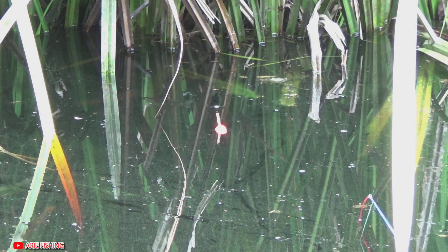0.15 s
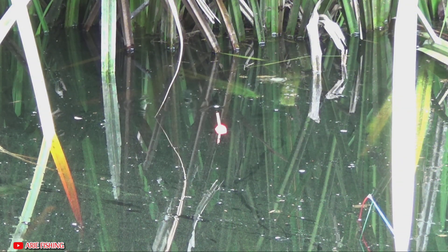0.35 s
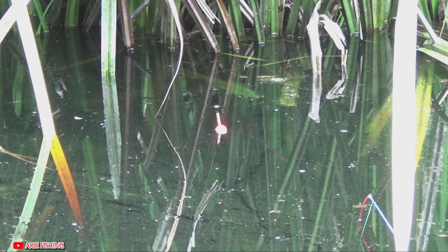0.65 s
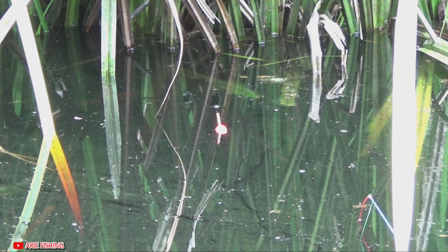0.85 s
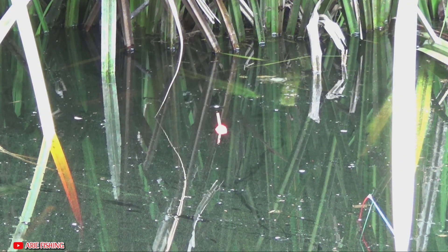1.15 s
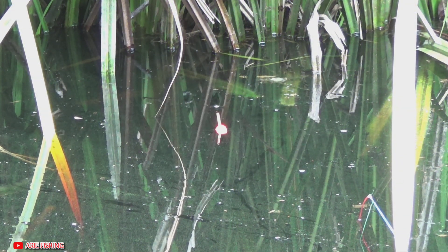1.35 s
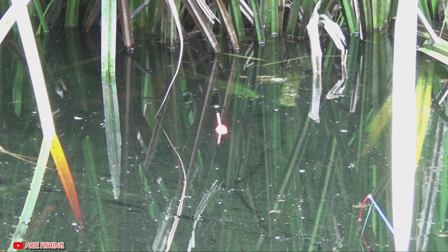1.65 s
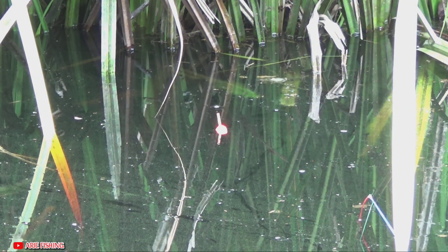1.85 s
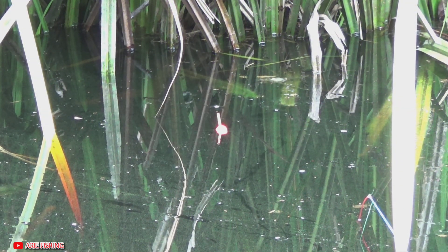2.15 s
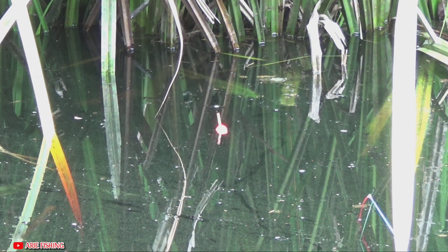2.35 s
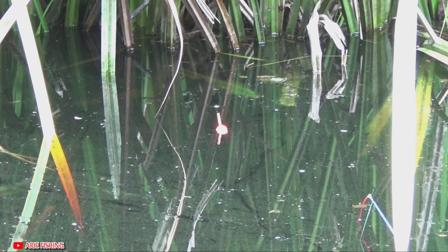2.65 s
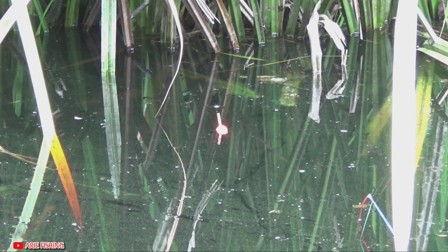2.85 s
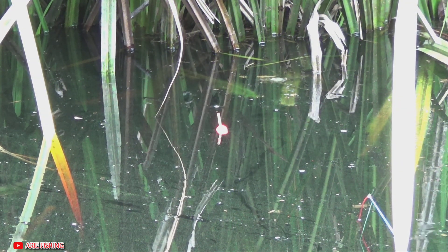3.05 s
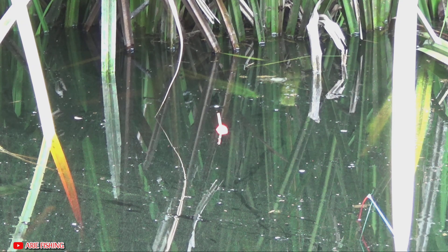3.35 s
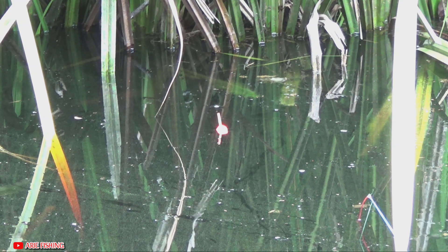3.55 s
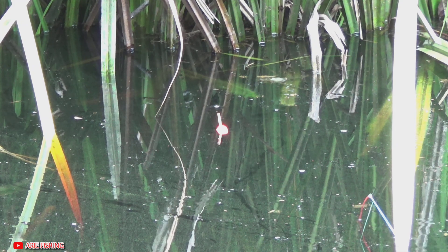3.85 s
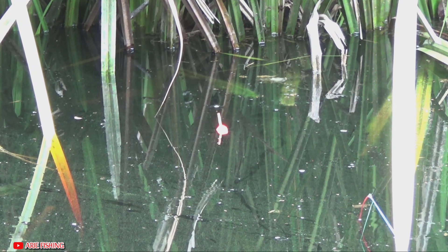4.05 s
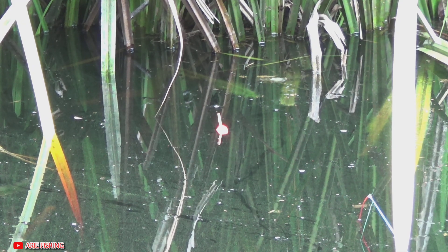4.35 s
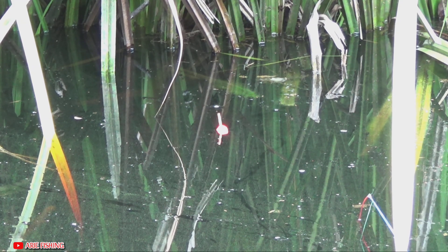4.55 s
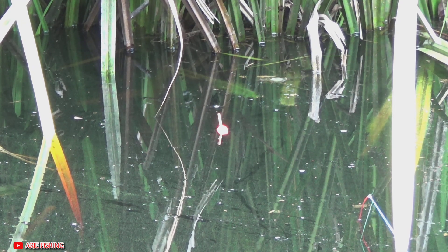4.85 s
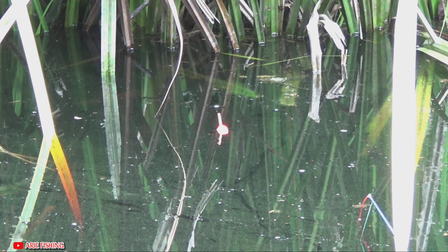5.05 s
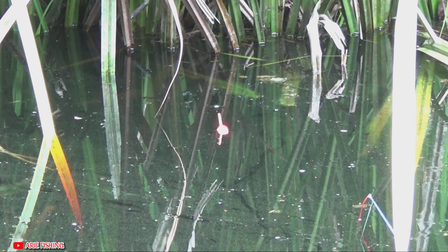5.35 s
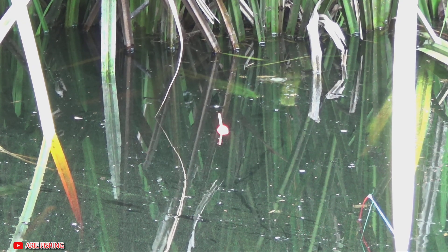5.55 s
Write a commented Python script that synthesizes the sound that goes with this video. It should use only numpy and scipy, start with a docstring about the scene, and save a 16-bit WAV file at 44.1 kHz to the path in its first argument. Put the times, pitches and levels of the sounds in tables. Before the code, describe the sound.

Dry reeds rustle close by in swells and snap, then something hollow knocks several times, over faint buzzing swamp insects.

```python
"""Among swamp reeds, with a stereo microphone close to dry leaves that rustle in swells and snap now and then.
The rustle is a hiss roughened by many tiny slips. Blows ring the modes of a hollow thing, mostly late on.
Around them insects buzz and trill over a faint hiss, a rough band swells, and one drop rings its bubble.
Farther off a frog chirps through the reeds, a bird rasps and a few clear pips sound."""
import sys
import numpy as np
from scipy import signal
from scipy.fft import rfft, irfft
from scipy.io import wavfile
from scipy.ndimage import uniform_filter1d

SR = 44100
rng = np.random.default_rng(int(sys.argv[2]) if len(sys.argv) > 2 else 0)


def int16_out(signal):
    """Quantize to a 16-bit WAV file."""
    q = np.round(np.clip(np.atleast_2d(signal).T, -1, 1) * 32767)
    wavfile.write(sys.argv[1], SR, q.astype(np.int16))


N = 250929
TIME = np.arange(N) / SR


def gain_of(db):
    """Decibels to gain."""
    return 10 ** (np.asarray(db) / 20)


def unit_rms(x):
    """Scales to rms 1."""
    return x / np.sqrt(np.mean(x ** 2) + 1e-20)


def at_frequency(points, hz):
    """Reads a table on a log-frequency axis."""
    f, value = np.transpose(points)
    return np.interp(np.log(hz + 1), np.log(f + 1), value)


def add(mix, start, sound, pan_db):
    """Mixes a sound in from start [s] on, pan_db louder on the left than on the right."""
    at = round(start * SR)
    sound = sound[max(-at, 0):]
    part = mix[:, max(at, 0):][:, :len(sound)]
    part += gain_of([[pan_db / 2], [-pan_db / 2]]) * sound[:part.shape[1]]


def resonate(x, hz, width):
    """A resonance that can glide: shifts hz down to zero, smooths, and shifts back."""
    turn = np.exp(2j * np.pi * np.cumsum(hz * np.ones(len(x))) / SR)
    pole = np.exp(-np.pi * width / SR)
    return 2 * (turn * signal.lfilter([1 - pole], [1, -pole], x / turn + 1e-18)).real


def noise_band(count, hz, width):
    """Noise through a resonance applied twice."""
    return unit_rms(resonate(resonate(rng.standard_normal(count), hz, width), hz, width))


def coloured(pair, spectrum, likeness, tilt, top_db, patchy_db):
    """Gives two noises a spectrum, a moving tilt and top, drifting patches and a left-right likeness."""
    hz, t, (left, other) = signal.stft(pair, SR, nperseg=512, noverlap=384)
    patches = rng.standard_normal(left.shape)
    patches = unit_rms(uniform_filter1d(uniform_filter1d(patches, size=14, axis=0), size=12, axis=1))
    same = at_frequency(likeness, hz)[:, None]
    right = same * left + np.sqrt(1 - same ** 2) * other
    slope_db = np.log2((hz[:, None] + 100) / 4000) * np.interp(t, TIME, tilt)
    lift_db = np.clip(4 * np.log2((hz[:, None] + 1) / 10000), 0, 1) * np.interp(t, TIME, top_db)
    colour = gain_of(at_frequency(spectrum, hz)[:, None] + slope_db + lift_db + patchy_db * patches)
    return signal.istft(np.array([left, right]) * colour, SR, nperseg=512, noverlap=384)[1][:, :N]


def swell_power(rows):
    """Power of a row of swells with rounded tops; rise and fall each span 10 dB."""
    power = np.full(N, 1e-12)
    for peak_time, db, rise, fall in rows:
        away = np.where(TIME < peak_time, (peak_time - TIME) / rise, (TIME - peak_time) / fall)
        power += gain_of(2 * (db - 10 * away ** 1.45))
    return power


# Spectrum of the swamp's ambience: (frequency [Hz], relative density [dB])
AMBIENCE_SPECTRUM = [(15, -51), (25, -19), (44, -11), (624, 3.5), (1370, -2.5), (3160, -2.5), (6050, -9.5),
                     (7710, 0.5), (8590, -4), (9570, -0.5), (11000, -7.5), (14800, -12.5), (16000, -14)]
# How alike it arrives on both sides of the microphone: (frequency [Hz], correlation [0-1])
AMBIENCE_LIKENESS = [(60, .85), (250, .7), (900, .5), (3000, .6), (7000, .75), (15000, 1)]


def swamp_ambience():
    """A faint steady hiss from all around."""
    noise, flat = rng.standard_normal((2, N)), np.zeros(N)
    hiss = coloured(noise, AMBIENCE_SPECTRUM, AMBIENCE_LIKENESS, tilt=flat, top_db=flat, patchy_db=.8)
    return gain_of(-53.5 + np.array([[.3], [-.3]])) * unit_rms(hiss)


# A far bird, near the centre:
# (time [s], length [s], pitch [Hz], width [Hz], level [dB], throb rate [Hz])
BIRD_NOTES = [(2.504, .22, 3940, 200, -49.5, 52), (2.515, .09, 3200, 700, -51, 66),
              (2.575, .2, 3200, 600, -49.5, 60)]


def far_bird():
    """Short rasping whistles with a quick start, a throb and a fading end."""
    out = np.zeros((2, N))
    for start, length, hz, width, db, throb_hz in BIRD_NOTES:
        t = np.arange(0, length, 1 / SR)
        shape = signal.windows.tukey(len(t), .12) * gain_of(-15 * t / length)
        shape *= 1 - 0.22 * np.cos(2 * np.pi * throb_hz * t)
        add(out, start, gain_of(db) * shape * noise_band(len(t), hz, width), pan_db=-.3)
    return out


# Pips in the distance, a little left: (time [s], pitch [Hz], level [dB])
PIP_NOTES = [(2.323, 1885, -46), (2.342, 1890, -43.5), (2.362, 1920, -49), (2.863, 3750, -50)]


def far_pips():
    """Clear whistles of 16 ms."""
    out, t = np.zeros((2, N)), np.arange(0, .016, 1 / SR)
    for start, hz, db in PIP_NOTES:
        add(out, start, gain_of(db) * np.sin(2 * np.pi * hz * t) * np.hanning(len(t)), pan_db=3.0)
    return out


# A far frog repeats its phrase off to the right: (time [s], level [dB])
FROG_PHRASES = [(1.807, -50), (2.401, -52), (2.995, -50.5)]
# The chirps of one phrase: (delay [s], relative level [dB])
FROG_CHIRPS = [(0, -6), (.043, -1.5), (.125, 0), (.166, 1.5)]


def far_frog():
    """Each chirp holds its top pitch briefly, drops, and smears out among the reeds."""
    out, t = np.zeros((2, N)), np.arange(0, .028, 1 / SR)
    pitch = np.interp(t, [0, .01, .02, .028], [2500, 2497, 1926, 1870])
    shape = signal.windows.tukey(len(t), .45) * gain_of(-220 * t)
    chirp = shape * np.sin(2 * np.pi * np.cumsum(pitch) / SR)
    tail = 0.042 * gain_of(-60 * np.arange(6000) / SR / 0.14)
    for start, db in FROG_PHRASES:
        for delay, chirp_db in FROG_CHIRPS:
            scatter = tail * rng.standard_normal(len(tail))
            scatter[0] = 1  # the direct path to the microphone
            add(out, start + delay, gain_of(db + chirp_db) * signal.oaconvolve(chirp, scatter), -6.0)
    return out


# A rasp in the background, a little left: (peak time [s], level [dB], rise [s], fall [s])
RASP_SWELLS = [(.1, -58, .3, .4), (.55, -52, .1, 0.09), (.9, -45, 0.22, .22), (2, -60, .2, 0.13),
               (3.3, -55, 0.27, .2), (3.62, -56, .2, .15)]


def rasp():
    """A broad rough band near 2 kHz that swells and fades."""
    level = np.sqrt(swell_power(RASP_SWELLS))
    centre, spread = (level * noise_band(N, hz=2160, width=1170) for _ in range(2))
    return gain_of([[1.5], [-1.5]]) * centre + np.outer([.35, -.35], spread)


# Insects around the microphone: (time [s], buzz level [dB], chorus level [dB])
INSECT_LEVELS = [(0, -52, -59), (.6, -49, -56), (1.5, -55, -60.5), (2.5, -69, -61.5), (3.2, -59.5, -62),
                 (4, -56.5, -58.5), (4.8, -56, -60), (5.69, -52, -63)]


def insects():
    """A high buzz that throbs about eight times a second and a smooth lower chorus."""
    beat = np.sin(2 * np.pi * 8.2 * (TIME - 5.354))
    depth_db = np.interp(TIME, [4.3, 4.9], [2, 4])
    throb = gain_of(depth_db * np.tanh(2 * beat))
    times, *levels = np.transpose(INSECT_LEVELS)
    buzz, chorus = (gain_of(np.interp(TIME, times, db)) for db in levels)
    centre, spread = (buzz * throb * noise_band(N, 9580, 810) + chorus * noise_band(N, 7830, 800)
                      for _ in range(2))
    return centre + np.outer([.35, -.35], spread)


# One cricket, a little left: (time [s], length [s], level [dB])
CRICKET_TRILLS = [(-.1, 0.34, -53.5), (.66, 0.29, -51), (1.941, .38, -51), (2.75, .38, -53.5),
                  (3.632, 0.33, -50)]


def cricket():
    """A grainy trill that climbs at the start and pulses with 85 wing strokes a second."""
    out = np.zeros((2, N))
    for start, length, db in CRICKET_TRILLS:
        t = np.arange(0, length, 1 / SR)
        pitch = np.interp(t, [0, .035, .075, .35], [6900, 6850, 7200, 7150])
        swell_db = np.interp(t, [0, .05, .09, .28, .36], [-5, -0.5, 2.0, 2.5, -11])
        shape = gain_of(db + swell_db) * signal.windows.tukey(len(t), .3)
        strokes = 1 + 0.16 * np.sin(2 * np.pi * 85 * t)
        tone = unit_rms(noise_band(len(t), pitch, 60) + 0.73 * noise_band(len(t), pitch, 270))
        add(out, start, shape * strokes * tone, pan_db=3.0)
    return out


# A drop of water to the right: (time [s], length [s], first pitch [Hz], last pitch [Hz], level [dB])
DROP = (4, 0.01, 718, 1102, -39)


def water_drop():
    """The bubble of a drop rises in pitch as it nears the surface."""
    out = np.zeros((2, N))
    start, length, first_hz, last_hz, db = DROP
    pitch = np.geomspace(first_hz, last_hz, round(length * SR))
    bubble = np.sin(2 * np.pi * np.cumsum(pitch) / SR) * signal.windows.tukey(len(pitch), .4)
    add(out, start, gain_of(db) * bubble, pan_db=-4.0)
    return out


# Modes of the hollow thing: (frequency [Hz], level [dB], nominal t60 [s])
HOLLOW_MODES = [(148.6, -3.5, 0.24), (183, -7, .1), (225.6, -2.5, 0.16), (267, -6.5, 0.145),
                (402, -8, 0.093), (517, -6, 0.14), (585, 0.5, .12), (732, 0.5, 0.088), (1054, -17, .06),
                (1200, -9.5, 0.089), (1300, -16, 0.091), (1650, -6, .07), (2003, -18, 0.072),
                (2860, -19, .05)]
# Blows on it, left of the microphone:
# (time [s], peak level [dB], centre [Hz], contact [s], lift of the deepest mode [dB])
BLOWS = [(1.89, -44, 330, 0.0065, -20), (4.04, -41, 657, 0.0085, -12), (4.16, -37, 340, 0.017, -5),
         (4.2426, -10, 478, .0025, 0), (4.301, -31.5, 303, .0057, 5), (4.362, -25.5, 274, 0.0015, -4.5),
         (4.415, -28.5, 545, 0.014, -6), (4.461, -37.5, 255, 0.0075, 4), (4.52, -41, 250, .012, 0),
         (4.56, -43, 220, .015, 2), (4.627, -20, 710, .012, -8), (4.718, -31, 613, 0.015, -1),
         (4.789, -38.5, 197, 0.0043, 4), (4.815, -34.5, 360, .0045, -4), (4.857, -35.5, 206, 0.018, 2.5),
         (4.905, -38, 220, .008, 2), (5.018, -37, 460, .014, -10), (5.1042, -15.5, 422, 0.0018, -7),
         (5.169, -33.5, 700, 0.018, -12), (5.223, -36, 570, .015, -10), (5.27, -40, 450, .015, -6)]


def hollow_knocks():
    """A blow gives a short thud and rings the modes near its centre; a long contact scuffs them."""
    out, t = np.zeros((2, N)), np.arange(12000) / SR
    low_cut = signal.butter(8, 122, "high", fs=SR, output="sos")  # a small body radiates no deep bass
    hz, mode_db, t60 = (column[:, None] for column in np.transpose(HOLLOW_MODES))
    for start, db, centre_hz, contact, deep_db in BLOWS:
        damping = 0.87 + 28 * contact  # a long contact damps the ring more
        spot_db = 1.3 * rng.standard_normal(hz.shape)  # the struck spot favours some modes
        struck_db = mode_db + spot_db - 2.9 * np.log2(hz / centre_hz) ** 2
        struck_db[0] = mode_db[0] + deep_db
        detune = 1 + .01 * rng.standard_normal(hz.shape)  # the grip shifts each mode a little
        ring = (gain_of(struck_db - 60 * damping * t / t60) * np.sin(2 * np.pi * hz * detune * t)).sum(0)
        thud = np.sin(2 * np.pi * centre_hz * t) * gain_of(-60 * t * centre_hz / 12)  # lasts 12 cycles
        rattle = noise_band(len(t), 700, 1500) * gain_of(-60 * damping * t / 0.097)  # loose parts buzz
        body = ring / abs(ring).max() + 0.58 * thud + .13 * rattle
        span = t[:3000] / contact
        touches = rng.standard_normal(len(span)) * span * np.exp(-2 * span)
        touches *= contact / 0.0055 / np.linalg.norm(touches)
        touches[0] = 1  # the first touch leads a short contact
        knock = signal.sosfilt(low_cut, signal.oaconvolve(body, touches))
        add(out, start, gain_of(db) * knock / abs(knock).max(), pan_db=4.2)
    return out


# The slow bed of leaves rubbing close to the microphone:
# (time [s], level [dB], tilt [dB/octave], left over right [dB], lift above 10 kHz [dB])
RUBBING = [(0, -60, -0.5, 3, 0), (.35, -49.5, -0.5, 3, 0), (.5, -41, 1.5, 3.2, 0), (.83, -40, 0.1, 3.2, 0),
           (1.0, -32, 0.83, 3.2, 0), (1.38, -31, 1, 3.2, 0), (1.48, -45, 1, 2, 0), (1.6, -51.5, -.5, 1, 2),
           (2.155, -52, -2, 0, 0), (2.95, -63, 0, 0, 3), (3.33, -46.5, .5, 3.5, 5), (3.5, -43, 0, 3.5, 5),
           (3.9, -43, -.7, 2, 4), (4.01, -52, -2, 1.5, 3), (4.5, -53, -4.5, 4, 2), (4.85, -51, -4, 3.8, 2),
           (5.4, -53, -3.5, 3, 2), (5.69, -41.5, -0.3, 3, 1)]


def leaf_rubbing():
    """Level, tilt, pan and top lift of the rubbing at every sample."""
    times, *columns = np.transpose(RUBBING)
    return [np.interp(TIME, times, column) for column in columns]


# Sharp cracks close by: dry leaves snapping, and the bite of one knock:
# (time [s], level [dB], centre [Hz], width [Hz])
CRACKS = [(1.115, -30, 2200, 2000), (1.514, -38.5, 9600, 3000), (1.625, -37.5, 9600, 4000),
          (1.632, -39.5, 2500, 2500), (1.869, -43.5, 1240, 900), (2.068, -41.5, 4300, 1300),
          (2.278, -45, 3280, 2500), (2.301, -46, 3500, 2500), (2.845, -44, 11000, 5000),
          (2.974, -46.5, 2900, 1200), (3.056, -45.5, 3800, 3000), (3.308, -43, 6200, 5000),
          (3.324, -44, 5000, 9000), (3.4304, -19, 8700, 12000), (3.431, -26, 1800, 2500),
          (3.9354, -25, 1900, 2520), (4.21, -40, 5670, 3500), (4.627, -26, 1790, 2980),
          (4.873, -37, 4430, 5000), (4.941, -42, 2000, 1290)]
TICKS_PER_S, TICK_DB = 9, -47


def sharp_cracks():
    """Each crack is a sharp burst with a short settling tail; faint ticks fall by chance."""
    out, t = np.zeros((2, N)), np.arange(4000) / SR
    _, _, pan_db, _ = leaf_rubbing()
    gap, size, pitch = rng.random((56, 3)).T
    tick_times = np.cumsum(2 * gap / TICKS_PER_S)
    ticks = zip(tick_times, TICK_DB + 6 * (size - .5), 3000 * 4 ** pitch, 2500 * 4 ** pitch)
    for start, db, hz, width in [*CRACKS, *ticks]:
        settle_t60 = 0.042 * (2000 / hz) ** .3  # higher cracks settle sooner
        shape = gain_of(-60 * t / .01) + 0.46 * gain_of(-60 * t / settle_t60)
        crack = gain_of(db) * noise_band(len(t), hz, width) * shape
        add(out, start, crack, pan_db[min(round(start * SR), N - 1)])
    return signal.sosfilt(signal.butter(2, [400, 11500], "band", fs=SR, output="sos"), out)


# Spectrum of dry leaves at close range: (frequency [Hz], relative density [dB])
LEAF_SPECTRUM = [(35, -60), (60, -28), (139, -25), (180, -23), (238, -7.5), (315, -5.5), (803, -3.5),
                 (1090, -2), (1440, -3.5), (2140, -0.5), (3340, -4), (9570, -2), (14900, -21.5),
                 (16000, -31)]
# How alike they arrive on both sides of the microphone: (frequency [Hz], correlation [0-1])
LEAF_LIKENESS = [(60, .95), (600, .95), (1600, .97), (3500, .94), (7000, .62), (15000, .9)]
# Single swishes of a near leaf: (peak time [s], level [dB], rise [s], fall [s])
LEAF_SWISHES = [(.12, -45, .04, 0.034), (.222, -33.5, 0.061, 0.046), (.319, -40.5, 0.034, 0.037),
                (.394, -37.5, 0.027, .06), (.539, -36, .08, 0.071), (.659, -40, 0.03, 0.036),
                (.735, -37, 0.034, .09), (.898, -35.5, .06, 0.083), (1.217, -28, 0.082, 0.057),
                (1.322, -30, .04, .06), (1.626, -52, .04, 0.046), (3.143, -52, .06, .05),
                (3.233, -49, .03, .05), (3.385, -35.5, .035, .05), (3.44, -30.5, 0.036, 0.037),
                (3.622, -35.5, .1, .03), (3.712, -40.5, .04, .1), (3.946, -33.5, 0.027, 0.033),
                (4.061, -46.5, 0.025, .03), (4.21, -47.5, 0.09, 0.11), (4.33, -47, 0.071, .06),
                (4.425, -47.5, .05, 0.044), (4.635, -39.5, 0.077, 0.079), (4.884, -43, .025, 0.016),
                (5.183, -41.5, .04, 0.052), (5.278, -46, 0.046, 0.038), (5.493, -44.5, 0.056, .06)]
SLIPS_PER_S, PUFF_DECAY_S = 700, 0.0018


def leaf_rustle():
    """Dense slips, each a brief puff, ride on a hiss; swishes rise over the bed and brighten it."""
    bed_db, bed_tilt, pan_db, top_db = leaf_rubbing()
    level_db = 10 * np.log10(gain_of(2 * bed_db) + swell_power(LEAF_SWISHES))
    tilt = bed_tilt + 0.12 * (level_db - bed_db)
    slip_sizes = gain_of(3.9 * np.minimum(rng.exponential(1, N), 4))
    slips = slip_sizes * (rng.random(N) < SLIPS_PER_S / SR)
    puff = np.exp(-np.arange(400) / SR / PUFF_DECAY_S)
    grain = 1 + 0.49 * unit_rms(signal.oaconvolve(slips, puff)[:N])
    friction = grain * rng.standard_normal((2, N))
    rustle = unit_rms(coloured(friction, LEAF_SPECTRUM, LEAF_LIKENESS, tilt, top_db, patchy_db=1.0))
    return gain_of(level_db + np.outer([.5, -.5], pan_db)) * rustle


def scene():
    """The swamp as it reaches the microphone."""
    calls = cricket() + insects() + far_bird() + far_pips() + far_frog() + rasp()
    return calls + leaf_rustle() + sharp_cracks() + hollow_knocks() + water_drop() + swamp_ambience()


# The microphone's two ports hear bass and high treble alike: (frequency [Hz], side gain [dB])
STEREO_WIDTH = [(60, -14), (200, -5), (500, 0.5), (1200, 4.5), (5000, 3), (9000, 1), (11500, -9),
                (16000, -28)]


def record(dry):
    """The pair of ports shapes the stereo width, then the band ends at 15.6 kHz."""
    mid, side = (dry[0] + dry[1]) / 2, (dry[0] - dry[1]) / 2
    side_gain = gain_of(at_frequency(STEREO_WIDTH, np.fft.rfftfreq(N, 1 / SR)))
    side = irfft(rfft(side) * side_gain, N)
    low_pass = signal.firwin(511, 15600, window=("kaiser", 9), fs=SR)
    return signal.oaconvolve([mid + side, mid - side], low_pass[None], "same")


dry = scene()
out = record(dry)
int16_out(out)
```